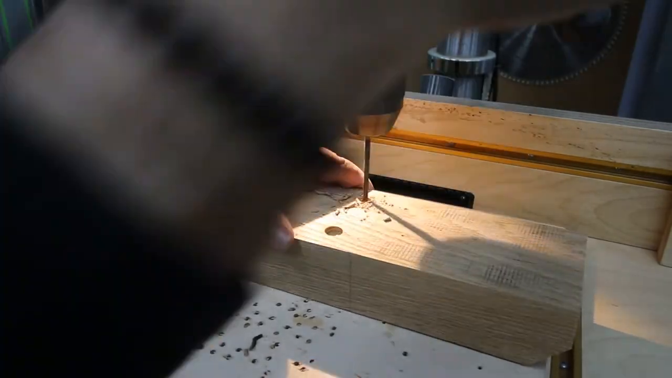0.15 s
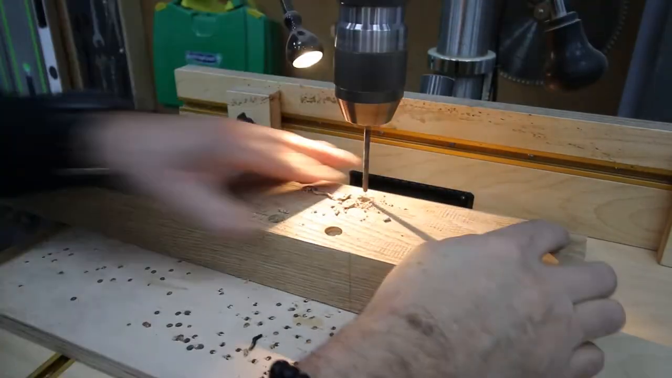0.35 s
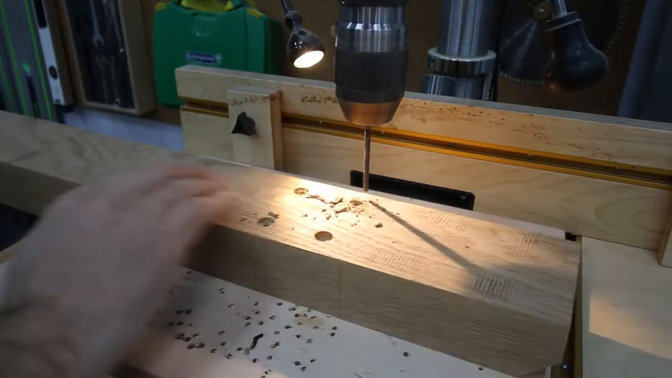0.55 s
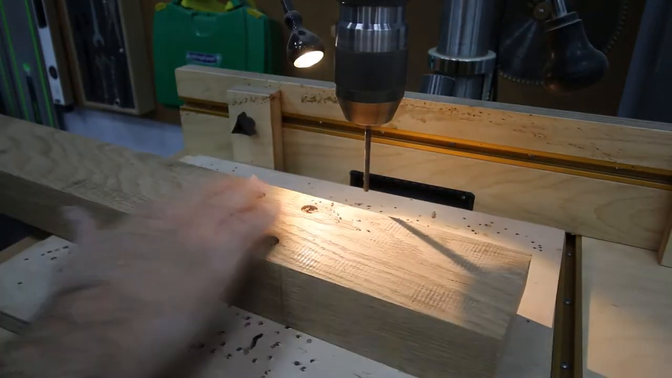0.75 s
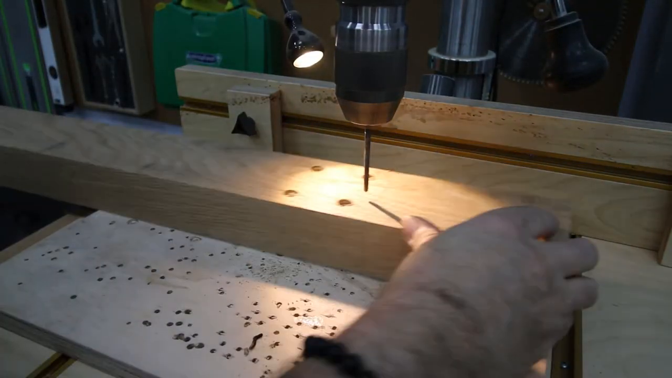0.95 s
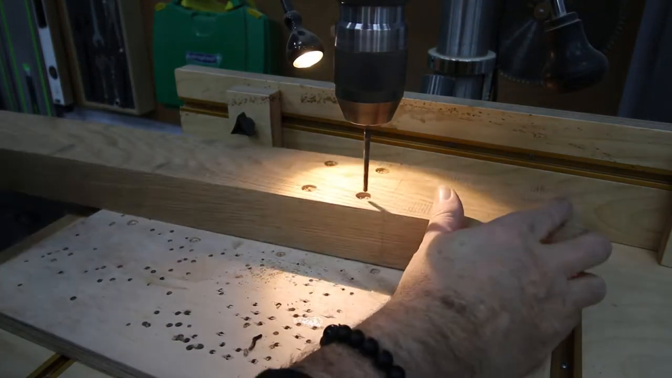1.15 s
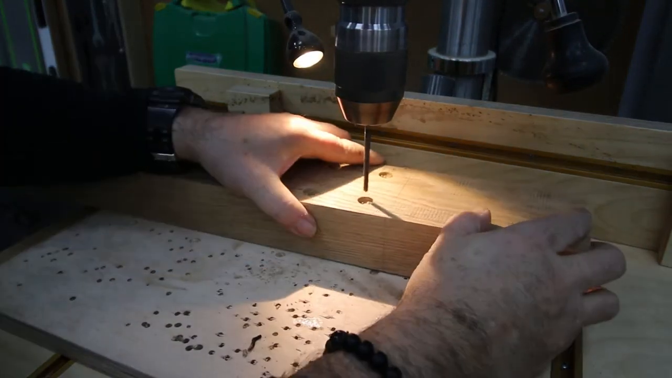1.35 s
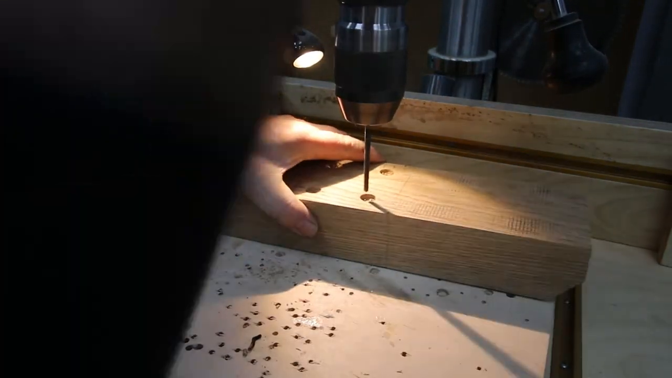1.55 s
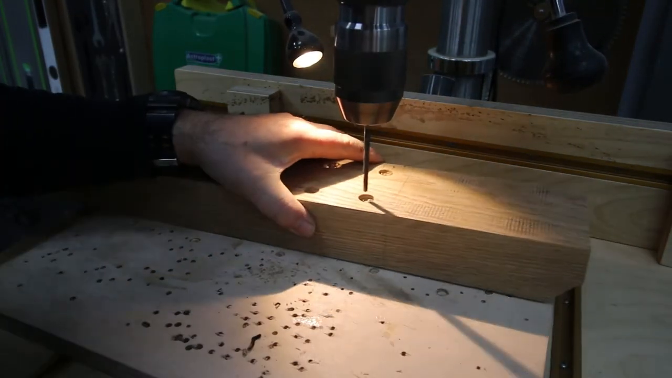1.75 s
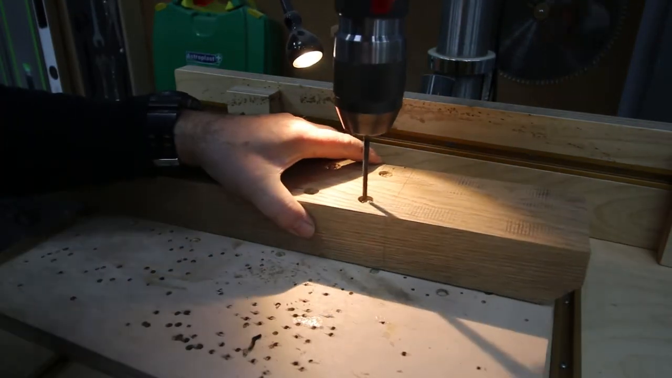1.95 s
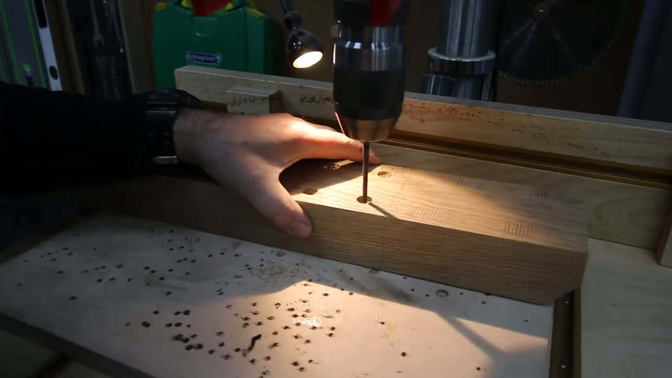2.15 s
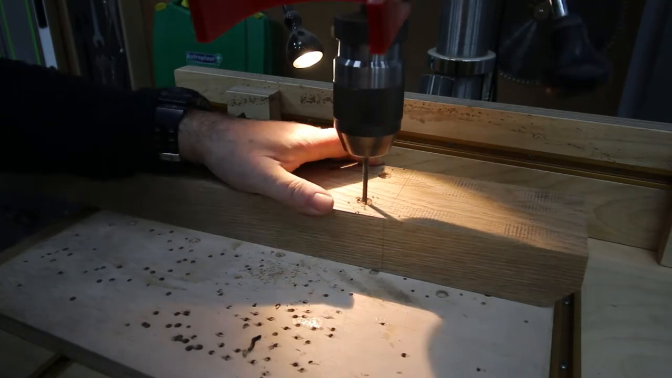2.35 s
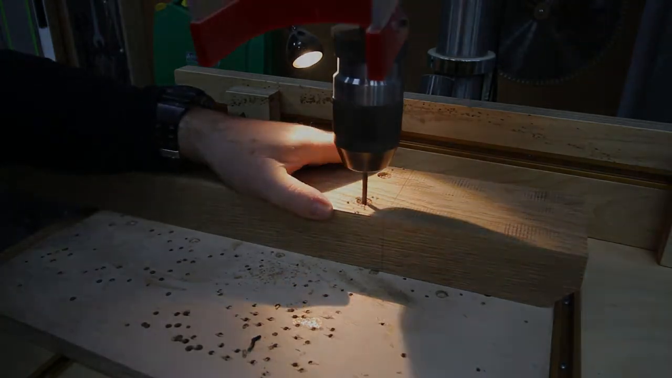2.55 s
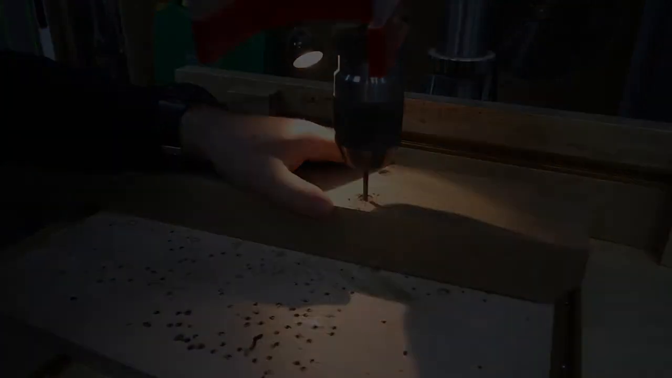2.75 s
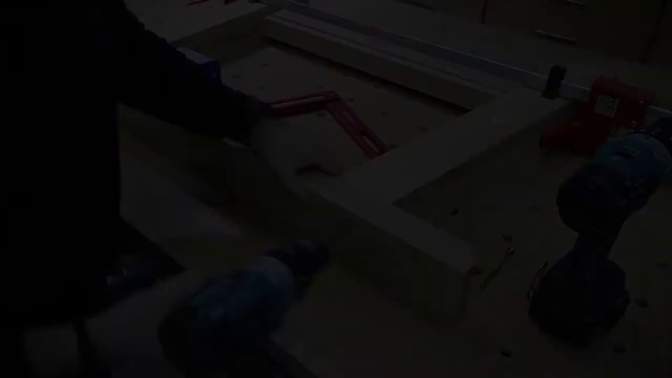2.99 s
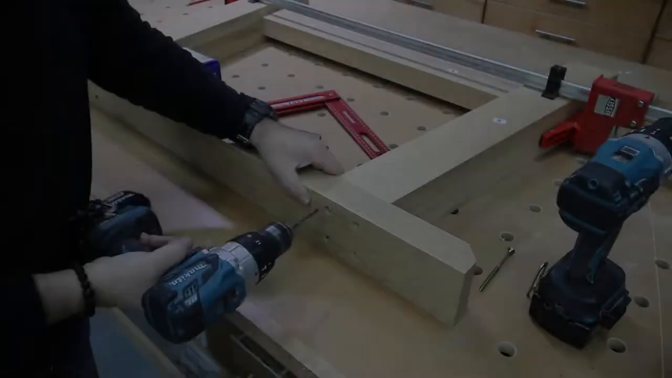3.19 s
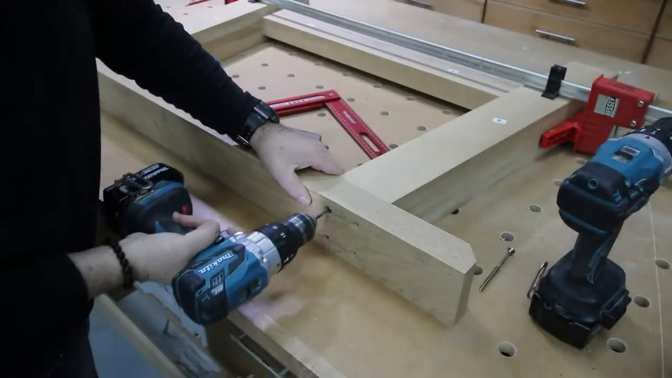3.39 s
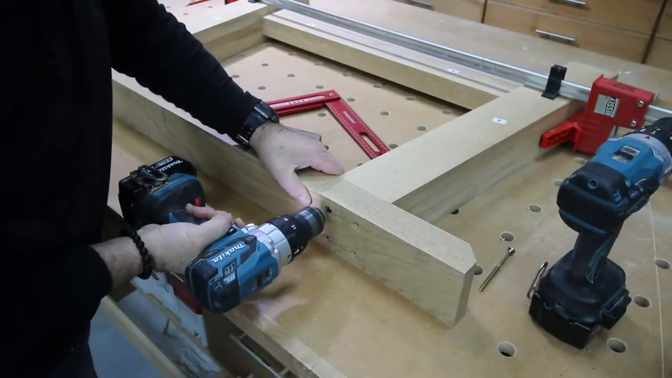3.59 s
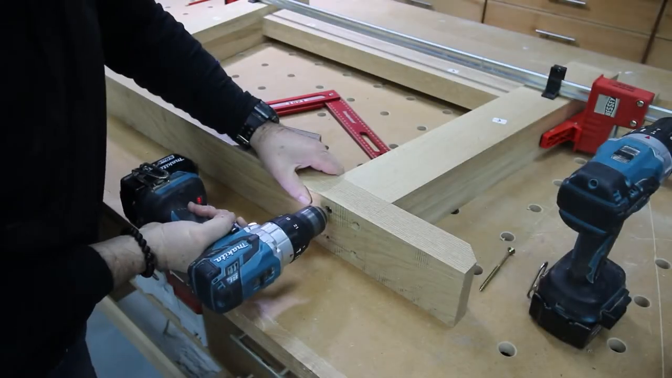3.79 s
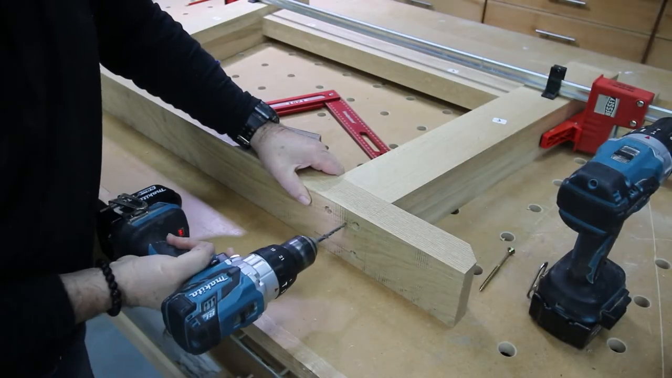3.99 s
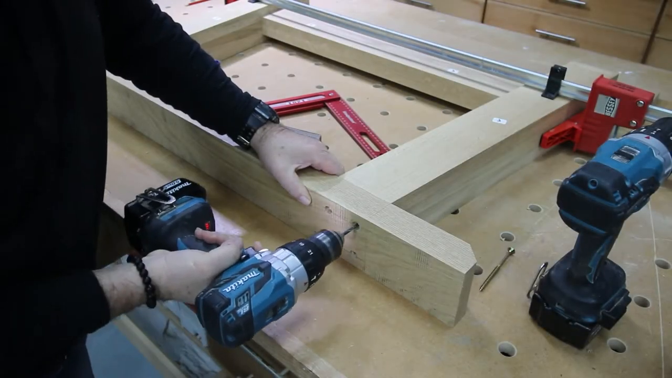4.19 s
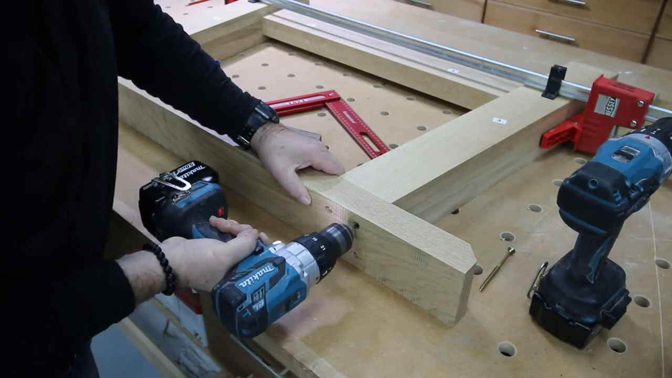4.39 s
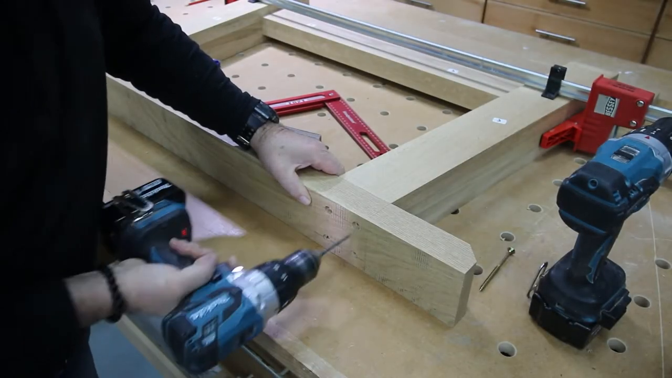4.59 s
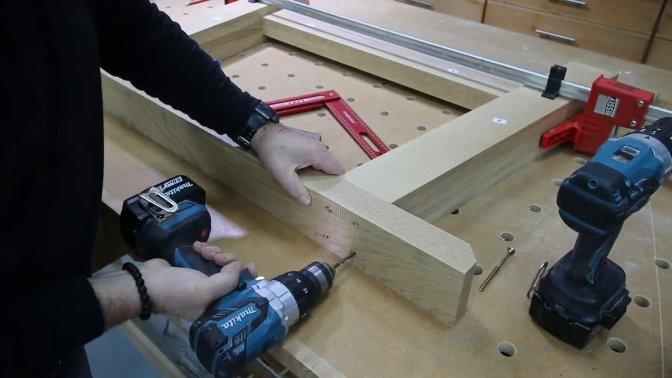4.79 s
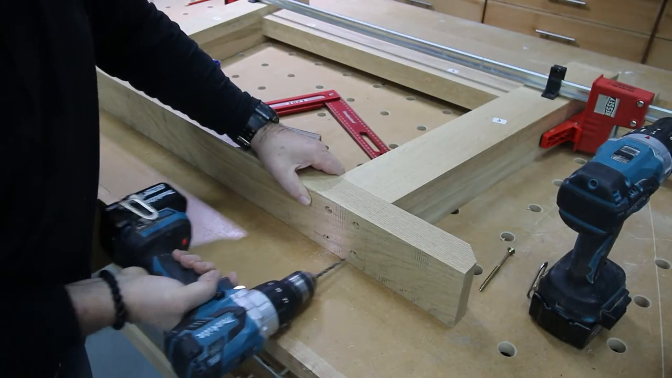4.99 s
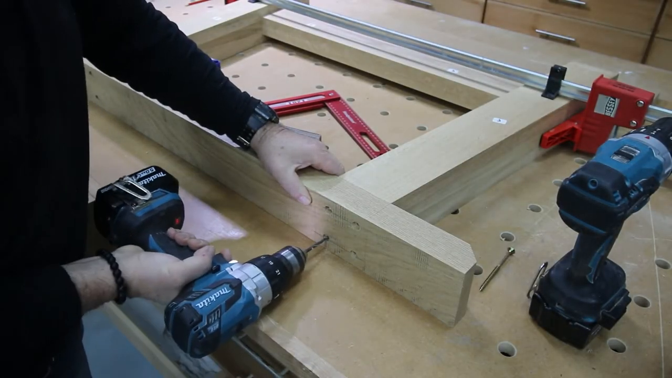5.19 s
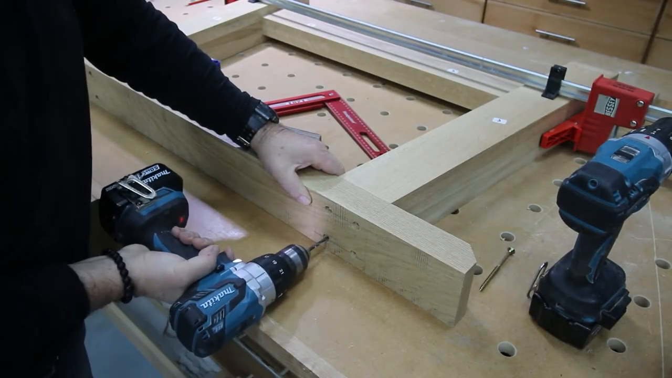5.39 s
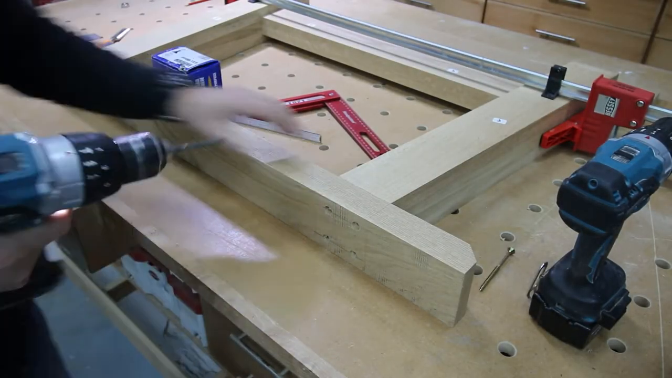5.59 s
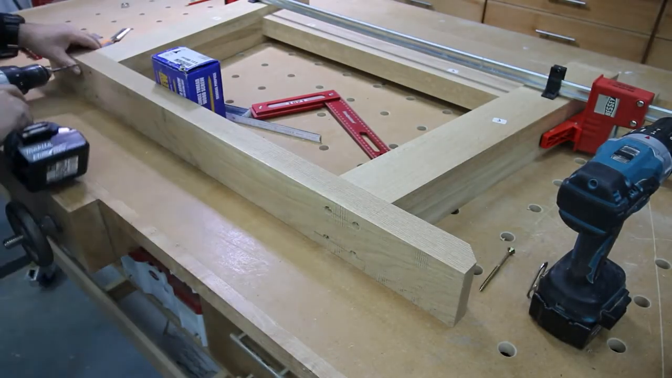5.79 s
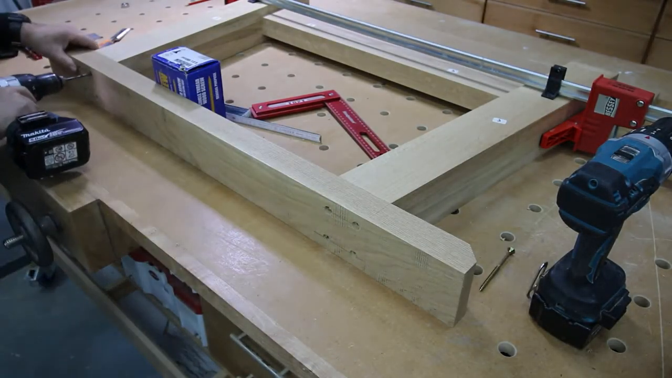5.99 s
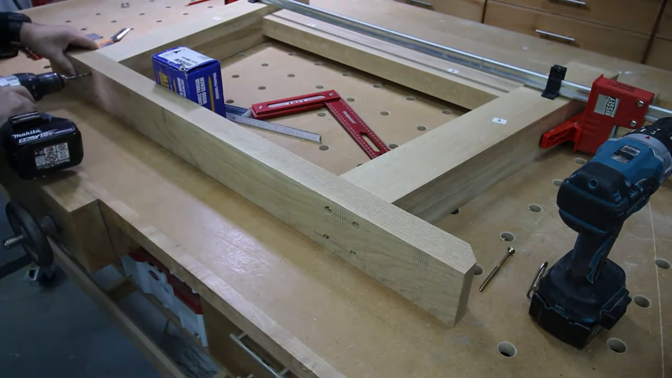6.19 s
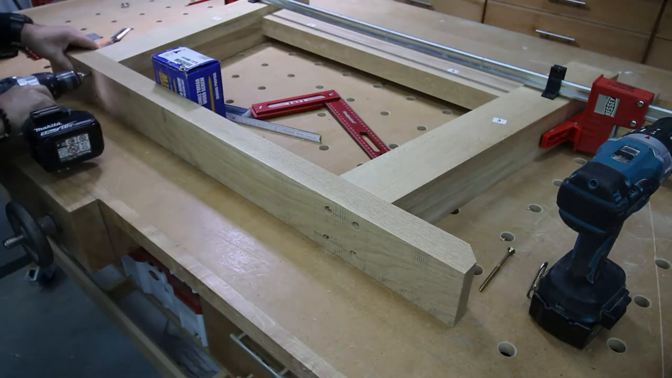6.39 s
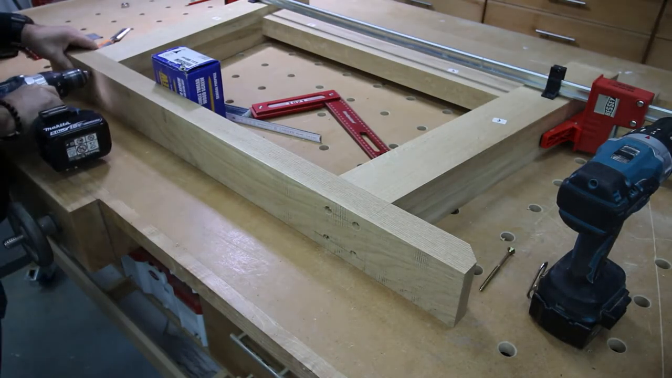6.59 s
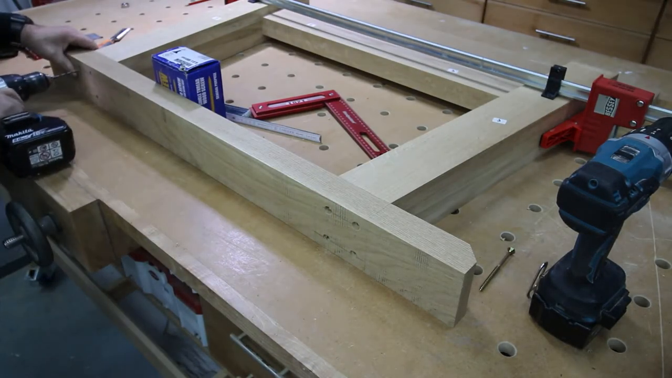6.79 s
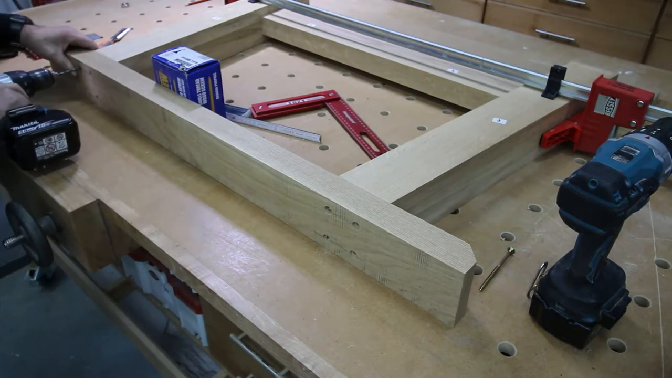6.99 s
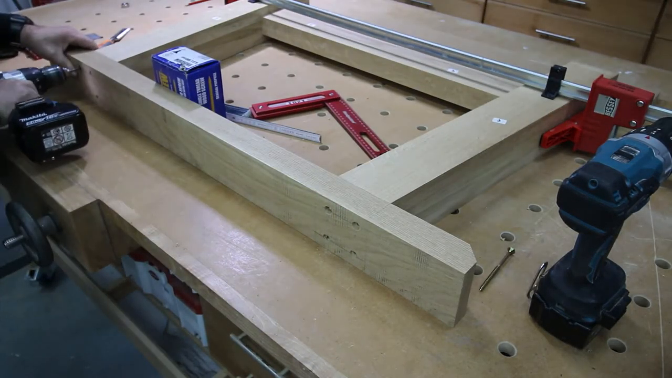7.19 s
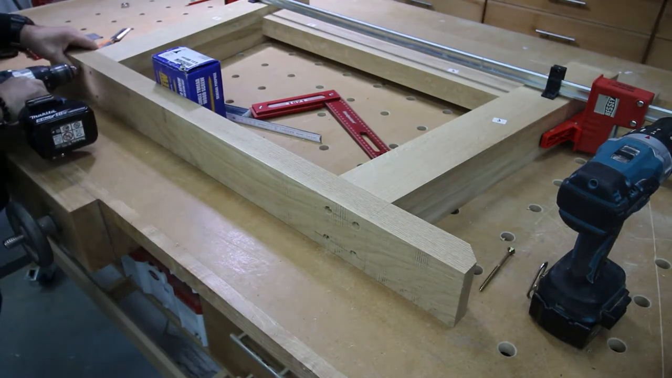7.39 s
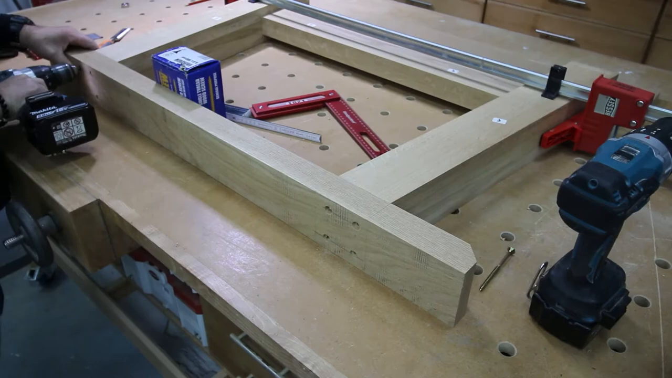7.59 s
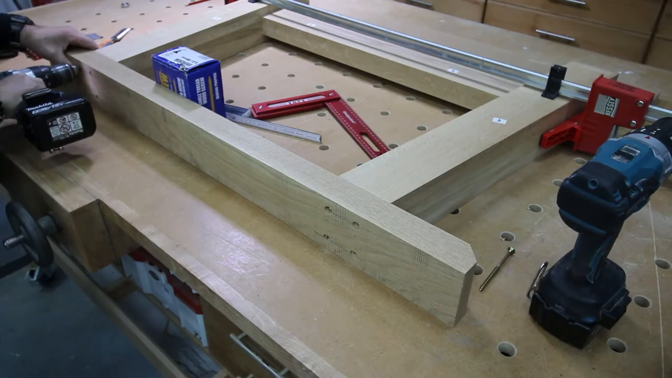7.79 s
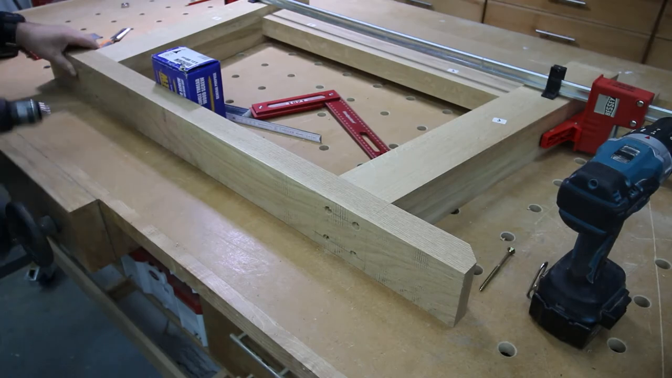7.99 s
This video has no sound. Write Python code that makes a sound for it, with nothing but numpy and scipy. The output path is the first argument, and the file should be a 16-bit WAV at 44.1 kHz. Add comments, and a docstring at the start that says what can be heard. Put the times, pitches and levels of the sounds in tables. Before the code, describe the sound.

Steady rattling drill press cuts off; hands and tool knock on a wooden frame, and a cordless drill whirs in brief bursts with metallic clicks.

```python
"""Small workshop. A belt-driven drill press hums and rattles into a wooden rail, then stops abruptly:
steady tones plus random impacts that ring the castings. A cordless drill then makes short runs into
a wooden frame: sines at the gear mesh rate and shaft orders whine, filtered impacts chatter and hiss.
Its spindle lock clacks (decaying ticks), the tool knocks on wood (noise bursts with damped modes),
a sleeve brushes past (dense tiny impacts), and quiet room noise with a faint hum lies beneath."""
import sys
import numpy as np
from scipy import signal
from scipy.fft import rfft, irfft, next_fast_len
from scipy.io import wavfile
from scipy.ndimage import map_coordinates

SR = 44100
rng = np.random.default_rng(int(sys.argv[2]) if len(sys.argv) > 2 else 0)


def store_wav(level_fs):
    """Save 16-bit WAV to argv[1]."""
    pcm = np.round(np.clip(np.atleast_2d(level_fs), -1, 1) * 32767)
    wavfile.write(sys.argv[1], SR, pcm.T.astype(np.int16))


N = 355005
T = np.arange(N) / SR

# Press motor and bearing tones: (frequency [Hz], rms level [dB], phase wander [rad])
PRESS_TONES = [(195.5, -80.5, 1.2), (400.4, -52, 0.05), (702, -56, 4.5), (741.4, -55.5, 0.37),
               (798, -51.5, 0.085), (1092.6, -50, 0.44), (1323, -55, 0.55), (1466, -53.5, 0.46),
               (1714, -51.5, 0.82), (1820, -54, 1.4), (2600, -55, 0.44), (3077, -55, 0.18)]
# Castings and belt cover resonances: (frequency [Hz], width [Hz], gain [dB])
PRESS_BODY = [(384.6, 8.3, -2.5), (805, 64, -13.5), (1100, 28, 8), (1480, 83, 3), (1825, 66, 4),
              (2544, 285, 2), (3070, 17, 2.5), (3840, 430, -3.5)]
# Spectrum of the press clatter: (frequency [Hz], relative density [dB per Hz])
PRESS_CLATTER = [(59, -77), (100, -70), (358, -13), (395, -5), (451, -14), (774, 2.5), (1020, 1),
                 (1090, 0.5), (1200, -2.5), (1780, 6.5), (2000, -18), (2560, 2), (5000, -13.5), (6500, -43),
                 (11000, -120)]
# Spectrum of the press cutting noise: (frequency [Hz], relative density [dB per Hz])
PRESS_CUT = [(2060, -30), (3500, -13), (3870, -8.5), (4600, -10.5), (4780, 0), (5900, -5.5), (7460, -3.5),
             (8100, -9), (10400, -7), (15100, -20), (16000, -16.5)]
PRESS_END_S = 2.467
PRESS_DB, PRESS_RISE_DB, PRESS_RISE_S = -38.5, 8, 0.05
BELT_LAPS_PER_S, BELT_SWELL_DB, FEED_WANDER_DB = 7.2, 1.0, 0.78

# Cordless drill trigger pulls: (start [s], attack [s], cutting [s], trigger held [s], braking [s],
# speed lost in braking [share], mesh rate while cutting [Hz], chatter [dB], hiss [dB],
# mesh tone [dB], its octave [dB], brake rasp [dB])
RUNS = [(3.553, 0.025, 0.24, 0.35, 0.032, 0.39, 1965, -49.5, -46.5, -47.5, -52, -48),
        (4.373, 0.0084, 0.12, 0.25, 0.035, 0.37, 1944, -48, -45, -45, -54, -43.5),
        (6.485, 0.028, 0.11, 0.21, 0.075, 0.4, 1931, -52, -49.5, -50.5, -50, -43.5),
        (7.099, 0.021, 0.103, 0.085, 0.06, 0.12, 1944, -52, -46.5, -61, -75, -68),
        (7.262, 0.063, 0.5, 0.678, 0.055, 0.08, 1917, -57.5, -56, -50, -68, -51)]
# Trigger feathered to start a hole, one curve each: (time [s], mesh rate [Hz], hiss level [dB])
CREEPS = [
    [(3.456, 937, -67), (3.55, 1398, -58.5)],
    [(6.256, 859, -57), (6.32, 1384, -47.5), (6.385, 927, -51.5), (6.415, 1309, -57.5), (6.455, 1010, -48),
     (6.525, 1910, -56.5)],
]
# Overtones of the whine wavering in the long last run:
# (time [s], octave level [dB], third harmonic level [dB])
WHINE_OVERTONES = [(7.31, -82, -71), (7.364, -51, -65), (7.426, -55.5, -46.5), (7.478, -44.5, -54),
                   (7.584, -75, -50), (7.632, -47.5, -52), (7.692, -50, -51), (7.726, -62, -66),
                   (7.8, -53.5, -63)]
# Motor shaft sidebands: (order [per shaft turn], level re mesh tone [dB])
SHAFT_ORDERS = [(6, -33.5), (8, -25.5), (9, -24), (13, -19.5), (14, -16), (17, -23.5), (23, -27),
                (29, -19.5), (31, -16.5), (38, -34), (45, -14), (60, -9.5)]
# Thin motor whistle: (order [per shaft turn], level re hiss before braking swell [dB])
WHISTLE = [(49, -14.5), (100, -18)]
# Spectrum of the gear chatter: (frequency [Hz], relative density [dB per Hz])
GEARBOX = [(88, -80), (150, -56), (247, -34.5), (588, -6.5), (650, -11), (941, -0.5), (1480, -1.5),
           (1730, 3), (2770, -3), (3960, -21), (4500, -17), (5850, -28), (9900, -120)]
# Spectrum of the fan and chip hiss: (frequency [Hz], relative density [dB per Hz])
HISS = [(1760, -49.5), (3000, -8.5), (3680, -6), (3890, -2), (4380, -6.5), (5400, -7.5), (7780, -5),
        (11300, -5.5), (13200, -1), (16000, -9)]
PINION_TEETH = 15
FREE_MESH_HZ, SPIN_UP_SHARE, SPIN_UP_S = 1965, 0.25, 0.012
WHINE_ATTACK_S, RELEASE_S = 0.07, 0.014
# fades once the bit is eased out
WHINE_FADE_DB_PER_S, CHATTER_FADE_DB_PER_S, HISS_FADE_DB_PER_S = 164, 91, 19.5
# one hard bite drags the motor down
BITE_S, BITE_WIDTH_S, BITE_SAG_HZ = 3.655, 0.042, 249.5
CREEP_CHATTER_DB = -9.5  # re hiss
SHUDDER_FREE, SHUDDER_SLOW = 0.001298, 0.00817  # shares of the speed

# Bit grabs and shakes the wood: (start [s], length [s], level at the end [dB])
GRABS = [(2.149, 0.33, -56.5), (6.3, 0.072, -65), (6.726, 0.067, -67), (7.109, 0.14, -65)]
GRAB_BUILD_DB = 1
# Tool and hands against the frame: (time [s], dry peak [dB], centre [Hz], treble re wood [dB])
KNOCKS = [(2.724, -58, 1120, 2), (2.832, -59, 1100, 2), (2.874, -61, 740, -8), (2.944, -50.5, 614, -0.5),
          (3.337, -49, 1600, -2), (3.408, -51.5, 1350, -1), (3.457, -48.5, 2070, -1),
          (3.992, -44.5, 1980, -1), (4.159, -46, 1715, -16), (4.236, -52, 1480, -24),
          (4.279, -42.5, 1506, -9), (4.312, -41.5, 1940, -6), (4.738, -59.5, 370, -14),
          (4.798, -37, 1200, -5), (5.006, -55, 1080, -8), (5.029, -50, 1160, -8.5),
          (5.144, -43.5, 2050, -10), (5.263, -57.5, 1920, -18), (5.331, -44, 1000, -21),
          (5.39, -62, 1170, -24), (5.48, -47.5, 1090, -10), (5.622, -54.5, 1050, -25),
          (5.728, -53, 804, -16), (5.993, -43, 1885, -5.5), (6.105, -46, 1440, -7), (6.952, -53, 912, -14),
          (6.995, -51, 1940, 0)]
# Modes of the frame and the bit against it: (frequency [Hz], level [dB], t60 [s])
FRAME = [(375, 0.5, 0.2), (616, 1.5, 0.021), (997, 9, 0.014), (1170, 0, 0.051), (1490, -11, 0.09),
         (2010, -11.5, 0.29), (2320, -28, 0.21)]
# Spindle lock and trigger: (time [s], dry peak [dB], centre [Hz])
CLACKS = [(2.6569, -47.5, 5940), (3.457, -45, 13100), (3.5645, -27, 13600), (3.568, -24.5, 13200),
          (4.158, -48, 3088), (4.2368, -45.5, 12240), (4.3804, -21.5, 12500), (6.261, -28, 14090),
          (6.4597, -25, 12760), (7.1068, -22.5, 9680)]
# Bit ringing on after touching the wood: (time [s], dry peak [dB], lower mode [Hz])
BIT_RINGS = [(3.338, -63, 1520), (3.99, -65, 2444), (4.159, -63, 1520), (4.28, -58, 1490),
             (5.145, -64, 1910)]
# Sleeve swishes: (time of peak [s], peak level [dB])
SWISHES = [(3.085, -50), (5.63, -63.5), (5.765, -57.5), (5.887, -55.5)]
# Spectrum of the sleeve cloth: (frequency [Hz], relative density [dB per Hz])
CLOTH = [(240, -62), (400, -34), (687, -20), (742, -18), (1440, -8), (3750, -8.5), (7400, -3.5),
         (14400, -9.5), (16000, -12)]
# Spectrum of the still workshop air: (frequency [Hz], relative density [dB per Hz])
AIR = [(18, -59), (30, -2), (49, -47), (103, -14), (311, -2.5), (355, 4), (404, -3.5), (1040, -3.5),
       (2230, -6.5), (3980, -3.5), (4780, -9), (11700, -17.5), (16000, -28)]
AIR_DB = -77  # before the lull gain
# Background sinking towards the end: (time [s], gain [dB])
LULL = [(7.2, 2), (7.35, -9)]
# Stereo width: (frequency [Hz], side minus mid [dB])
WIDTH = [(100, -24), (350, -44), (1300, -26), (2800, -15.5), (5500, -10), (12000, -5)]
# Stereo lean: (frequency [Hz], left minus right [dB])
LEAN = [(1200, 0), (2200, -0.6), (4000, -1.0), (12000, -2.3)]
TOP_HZ = 15850


def drill_press():
    """Motor tones, a rattle that rings the castings, and cutting noise in quick bursts."""
    feed = feed_gain()
    motor = turn(np.full(N, PRESS_TONES[1][0]))
    bearing = turn(104 * (1 + 0.05 * walk(61.8)))
    shake = undb(1.31 * walk(70))

    # loose parts strike in step with motor hum and bearing
    blows = impacts(per_s=7000, spread_db=1.5) * shake
    blows *= (1 + 0.53 * np.cos(motor)) * (1 + 0.13 * np.cos(2 * bearing))
    body = np.zeros(N)
    for k, (hz, width_hz, db) in enumerate(PRESS_BODY):
        body += (-1) ** k * undb(db) * resonate(blows, hz, width_hz)
    body = colour(body, [(150, -30), (350, -4), (700, 0), (3000, 0), (6000, -14)])
    clatter = colour(impacts(per_s=5000, spread_db=2.5) * shake, PRESS_CLATTER)
    rattle = undb(-2.5) * unit(body) + undb(-5.5) * unit(clatter)

    bursts = undb(2 * np.cos(bearing) + np.cos(2 * bearing)) * shake
    grains = impacts(per_s=16000, spread_db=1.5) * bursts
    # thin steel bit: two high pitches
    steel = resonate(grains, 10300, 450) + resonate(grains, 11400, 410)
    cut = undb(-12.0) * unit(colour(grains, PRESS_CUT)) + undb(-25.0) * unit(steel)

    tones = np.zeros(N)
    for hz, db, wander_rad in PRESS_TONES:
        phase = 2 * np.pi * hz * T + wander_rad * walk(21.84) + np.pi * rng.random()
        tones += undb(db) * np.sqrt(2) * np.sin(phase)

    # cutting noise outlasts the rest for a moment
    after_s = np.maximum(T - PRESS_END_S, 0)
    running = ramp(T / 0.008) * np.exp(-after_s / 0.0015)
    return (feed * rattle + tones) * running + feed * cut * np.exp(-after_s / 0.025)


def feed_gain():
    """The press comes up to level, then swells with each belt lap and with the hand on the feed lever."""
    rise_db = PRESS_RISE_DB * np.clip(1 - T / PRESS_RISE_S, 0, 1)
    belt_db = BELT_SWELL_DB * np.cos(turn(BELT_LAPS_PER_S * (1 + 0.093 * walk(4.9))))
    return undb(PRESS_DB - rise_db + belt_db + FEED_WANDER_DB * walk(20))


def cordless_drill():
    """Teeth whine at the mesh rate with shaft sidebands; gears chatter, fan and chips hiss, motor whistles."""
    mesh_hz, chatter, hiss, tone, octave = trigger_pulls()
    held_back = ramp((FREE_MESH_HZ - 60 - mesh_hz) / 200)
    shudder = SHUDDER_FREE * walk(90) + SHUDDER_SLOW * held_back * walk(250)
    mesh = turn(mesh_hz * (1 + shudder))
    shaft = mesh / PINION_TEETH

    s, octave_db, third_db = np.transpose(WHINE_OVERTONES)
    whine = tone * undb(1.5 * walk(45)) * np.sin(mesh)
    whine += (octave * undb(3.2 * walk(55)) + envelope(s, octave_db)) * np.sin(2 * mesh)
    whine += envelope(s, third_db) * np.sin(3 * mesh)

    # whistle swells while slowing from high speed
    slowing = ramp(-np.gradient(mesh_hz) * SR / 12000)
    braking = slowing * ramp((mesh_hz - 1150) / 300)
    whistle = hiss * undb(8.7 * braking + 3 * walk(150))
    for orders, gain in (SHAFT_ORDERS, tone), (WHISTLE, whistle):
        for order, db in orders:
            phase = round(order) * shaft + 2 * np.pi * rng.random()
            whine += gain * undb(db + 2.1 * walk(25)) * np.sin(phase)

    # part throttle: teeth press hard, the mesh groans unevenly
    groan = chatter * ramp((1700 - mesh_hz) / 400) * undb(2.5 * walk(120))
    whine += groan * (0.8 * np.sin(mesh) + 1.05 * np.sin(2 * mesh))

    # gear energy not in the whine is looser chatter, partly repeating with the shaft
    loose = np.sqrt(np.maximum(chatter ** 2 - 0.27 * tone ** 2, 0.15 * chatter ** 2))
    teeth = unit(impacts(per_s=5000, spread_db=2.5)) + 1.1 * each_turn(shaft)
    teeth = unit(colour(teeth, GEARBOX))
    chips = unit(impacts(per_s=14000, spread_db=2.5)) + 0.7 * each_turn(shaft)
    chips = unit(colour(chips, HISS))
    noise = loose * teeth + undb(walk(53)) * hiss * chips

    whine = workshop(np.sqrt(2) * whine, t60_s=0.35, wet_db=-10)  # sqrt(2): levels are rms
    return whine + workshop(noise, t60_s=0.38, wet_db=-3.5)


def trigger_pulls():
    """Runs spin up, cut, ease out, brake. Returns mesh Hz and gains of chatter, hiss, tone, octave."""
    mesh_hz, gains = np.full(N, float(FREE_MESH_HZ)), np.zeros((4, N))
    for (start, attack, cutting, held, brake_s, lost, cut_hz,
         chatter_db, hiss_db, tone_db, octave_db, rasp_db) in RUNS:
        age = T[:N - int(start * SR)]
        on = ramp(age / attack) * ramp(1 + (held + brake_s - age) / RELEASE_S)
        eased_s = np.maximum(age - cutting, 0)
        brake = ramp((age - held) / brake_s) ** 2
        load = ramp(age / WHINE_ATTACK_S) * undb(-WHINE_FADE_DB_PER_S * eased_s)
        spin = (1 - SPIN_UP_SHARE * np.exp(-age / SPIN_UP_S)) * (1 - lost * brake)
        mesh_hz[-len(age):] = spin * (FREE_MESH_HZ + (cut_hz - FREE_MESH_HZ) * load)
        rasp = brake * undb(rasp_db)
        chatter = np.hypot(undb(chatter_db - CHATTER_FADE_DB_PER_S * eased_s), undb(-16.5) * rasp)
        hiss = np.hypot(undb(hiss_db - HISS_FADE_DB_PER_S * eased_s), rasp)
        levels = np.array([chatter, hiss, load * undb(tone_db), load * undb(octave_db)])
        gains[:, -len(age):] += on * levels
    for s, hz, db in map(np.transpose, CREEPS):
        creeping = (T > s[0]) & (T < s[-1])
        mesh_hz = np.where(creeping, np.interp(T, s, hz), mesh_hz)
        gains[:2] = np.hypot(gains[:2], [envelope(s, db + CREEP_CHATTER_DB), envelope(s, db)])
    sag_hz = BITE_SAG_HZ * np.exp(-((T - BITE_S) / BITE_WIDTH_S) ** 2)
    return mesh_hz - sag_hz, *gains


def each_turn(shaft, count=120):
    """Uneven teeth and blades: one rough pattern of count harmonics repeats every shaft turn."""
    harmonics = np.exp(2j * np.pi * rng.random(count)) * (0.5 + rng.random(count))
    pattern = irfft(np.r_[0, harmonics], 4096)
    place = shaft / (2 * np.pi) * len(pattern)
    return unit(map_coordinates(pattern, [place], order=1, mode="grid-wrap"))


def grabbing_bit():
    """Cutting edges catch and the wood thrums, building slightly until they let go."""
    spectrum = [(100, -26), (160, -24), (260, -3.0), (420, 7.5), (800, -13.0)]
    thrum = unit(colour(impacts(per_s=1800, spread_db=0.5), spectrum))
    return thrum * sum(envelope([s, s + length], [db - GRAB_BUILD_DB, db]) for s, length, db in GRABS)


def knock(centre_hz, treble_db):
    """Blow on the frame: a crack and damped modes, coloured by the hardness of the contact."""
    t = T[:SR // 4]
    contact = rng.standard_normal(len(t)) * (np.exp(-t / 0.0058) + 0.11 * np.exp(-t / 0.0088))
    ring = np.zeros(len(t))
    for hz, db, t60_s in FRAME:
        ring += undb(db) * np.sin(2 * np.pi * (hz * t + rng.random())) * undb(-60 * t / t60_s)
    wood = resonate(unit(contact) + undb(-11.0) * unit(ring), centre_hz, 0.62 * centre_hz)
    wood = signal.sosfilt(signal.butter(2, [260, 3600], "band", fs=SR, output="sos"), wood)
    return unit(wood) + undb(treble_db) * unit(resonate(contact, 2100, 2500))


def clack(centre_hz):
    """Small steel parts snap together: a sharp tick, then a brief rattle."""
    t = T[:SR // 8]
    tick = np.exp(-t / 0.0005) * np.sin(2 * np.pi * centre_hz * t)
    rattle = rng.standard_normal(len(t)) * (0.3 * np.exp(-t / 0.003) + 0.035 * np.exp(-t / 0.04))
    impulse = 2.5 * (t == 0)
    return 0.5 * tick + resonate(rattle + impulse, centre_hz, 1.2 * centre_hz)


def bit_ring(hz):
    """Two close bending modes of the steel bit beat as they fade."""
    t = T[:SR // 3]
    modes = np.sin(2 * np.pi * hz * t) + 0.5 * np.sin(2 * np.pi * (hz + 45) * t)
    return modes * np.exp(-t / 0.061)


def strikes(table, sound):
    """Place one sound per row (time [s], peak [dB], ..) on the time line."""
    out = np.zeros(N + SR)
    for s, db, *shape in table:
        hit, start = sound(*shape), int(s * SR)
        out[start:start + len(hit)] += undb(db) * hit / np.abs(hit).max()
    return out[:N]


def sleeve():
    """Cloth fibres slip in soft swishes that swell quickly and trail off."""
    offset_s = np.array([-0.039, -0.018, 0.0069, 0.016, 0.16])
    shape_db = np.array([-17, -4.5, 0, -3.5, -35.5])
    stroke = sum(envelope(s + offset_s, db + shape_db) for s, db in SWISHES)
    return stroke * unit(colour(impacts(per_s=33000, spread_db=1.0), CLOTH))


def still_air():
    """Quiet room noise with a faint hum."""
    noise = unit(colour(rng.standard_normal(N), AIR)) * undb(AIR_DB + walk(3.06))
    hum = undb(-89.5) * np.sin(2 * np.pi * 359 * T + 0.44 * walk(7.4))
    return (noise + hum) * undb(np.interp(T, *np.transpose(LULL)))


def workshop(x, t60_s, wet_db):
    """Dense reflections from near walls and benches: decaying noise convolved with x."""
    t = T[:SR // 2]
    tail = rng.standard_normal(len(t)) * undb(-60 * t / t60_s) * (t > 0.004)
    return x + undb(wet_db) * signal.fftconvolve(x, tail / np.linalg.norm(tail))[:N]


def undb(db):
    """Decibels to gain."""
    return 10 ** (np.asarray(db) / 20)


def unit(x):
    """Scale to rms 1."""
    return x / np.sqrt(np.mean(x ** 2))


def ramp(x):
    """Limit to 0..1."""
    return np.clip(x, 0, 1)


def envelope(s, db, edge_s=0.0056):
    """Gain along a level curve, with short linear edges and silence beyond."""
    inside_s = np.minimum(T - s[0], s[-1] - T)
    return undb(np.interp(T, s, db)) * ramp(inside_s / edge_s + 1)


def colour(x, points):
    """Filter by a spectrum of (frequency [Hz], gain [dB]) points on a log frequency axis."""
    hz, db = np.transpose(points)
    size = next_fast_len(N + 8192)
    bins_hz = np.maximum(np.fft.rfftfreq(size, 1 / SR), 1)
    gain = undb(np.interp(np.log(bins_hz), np.log(hz), db))
    return irfft(rfft(x, size) * gain, size)[..., :N]


def resonate(x, hz, width_hz):
    """One resonance, gain 1 at its centre."""
    hz = min(hz, 0.45 * SR)
    return signal.lfilter(*signal.iirpeak(hz, hz / min(width_hz, SR / 3), fs=SR), x)


def walk(steps_per_s):
    """Smooth random motion of spread near 1."""
    steps = rng.standard_normal(4096)
    return map_coordinates(steps, [T * steps_per_s], order=2, mode="wrap")


def turn(hz):
    """Phase [rad] of something turning at hz."""
    return 2 * np.pi * np.cumsum(hz) / SR


def impacts(per_s, spread_db):
    """Tiny random impacts of uneven size."""
    size = rng.standard_normal(N) * undb(spread_db * rng.standard_normal(N))
    return (rng.random(N) < per_s / SR) * size


def sound_field():
    """Both drills and the handling noises in the workshop."""
    handling = strikes(KNOCKS, knock) + strikes(CLACKS, clack) + strikes(BIT_RINGS, bit_ring)
    handling = workshop(handling, t60_s=0.21, wet_db=-2.5)
    return drill_press() + cordless_drill() + grabbing_bit() + handling + sleeve() + still_air()


def scene():
    """Two close capsules: alike in the bass, while scattered treble reaches each differently."""
    mid, side = sound_field(), colour(sound_field(), WIDTH)
    left = colour(mid + side, [(hz, db / 2) for hz, db in LEAN])
    right = colour(mid - side, [(hz, -db / 2) for hz, db in LEAN])
    return np.array([left, right])


def record(dry):
    """Steep low-pass at TOP_HZ."""
    return signal.sosfilt(signal.ellip(10, 0.1, 70, TOP_HZ, fs=SR, output="sos"), dry)


dry = scene()
out = record(dry)
store_wav(out)
```